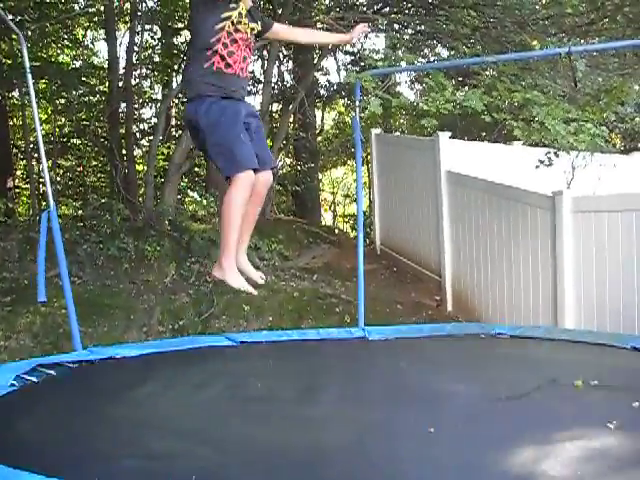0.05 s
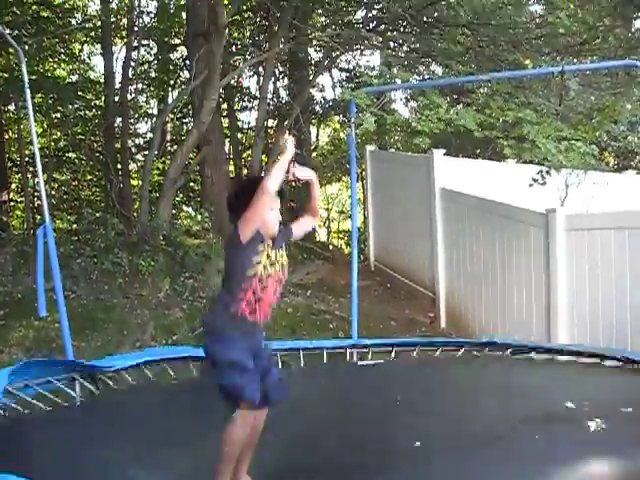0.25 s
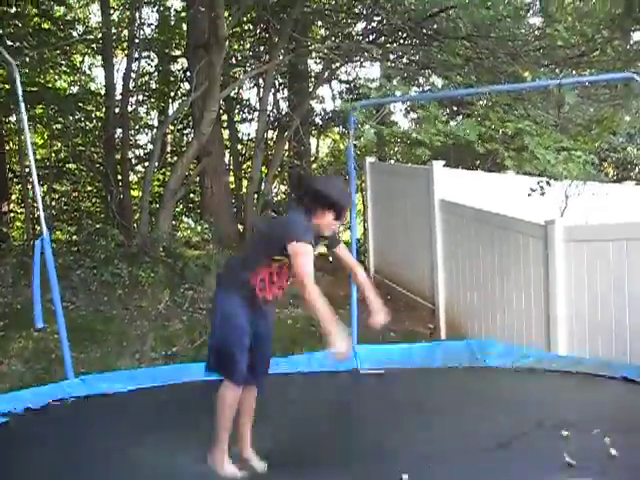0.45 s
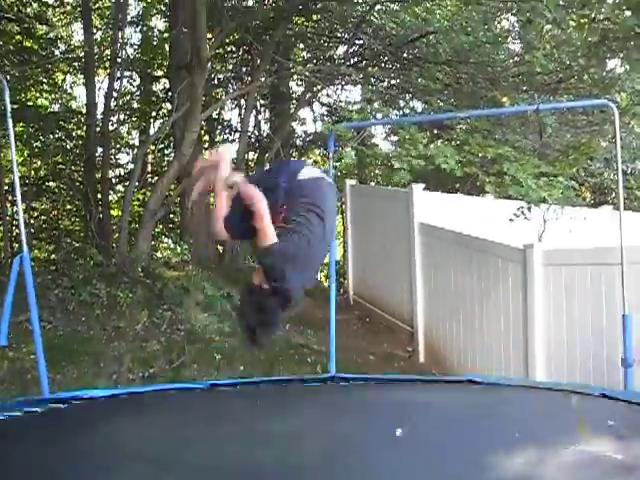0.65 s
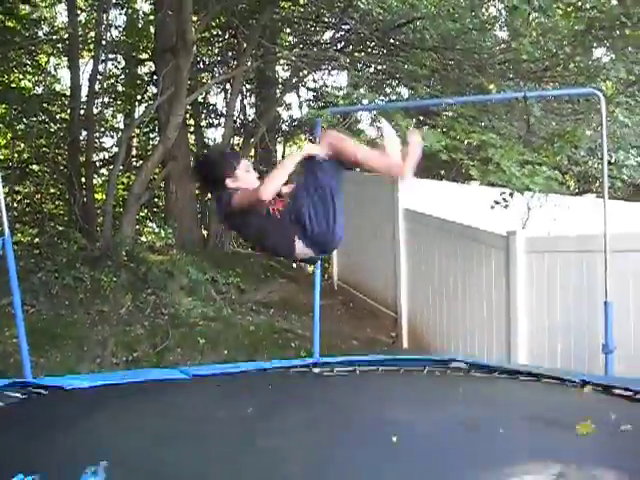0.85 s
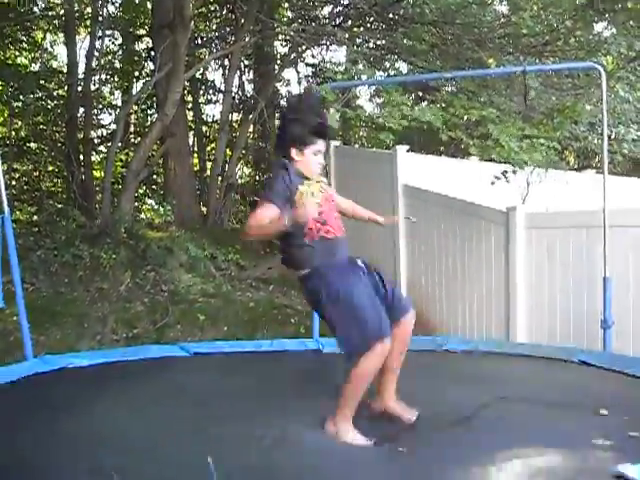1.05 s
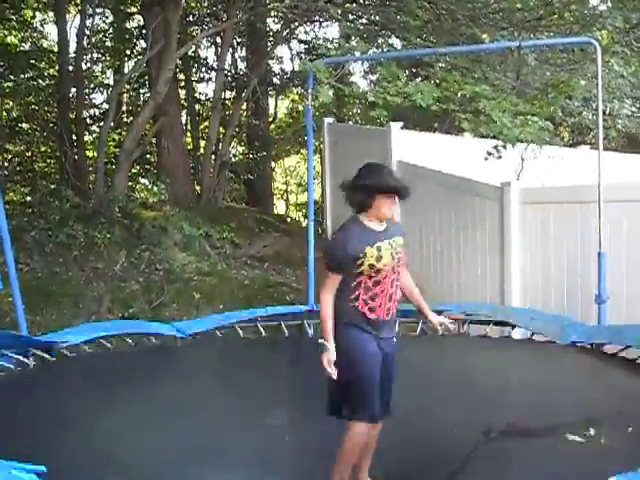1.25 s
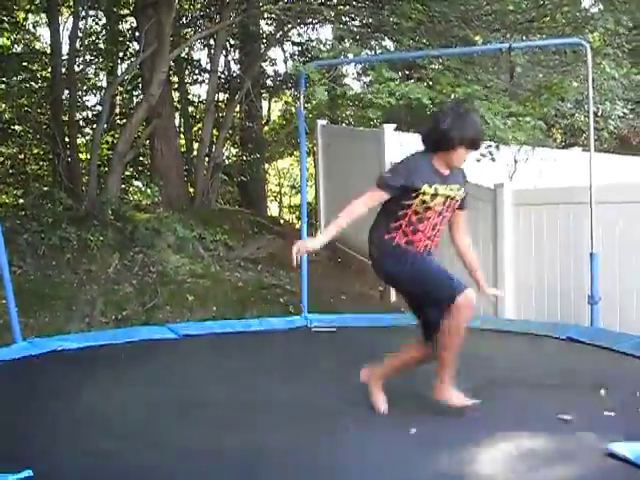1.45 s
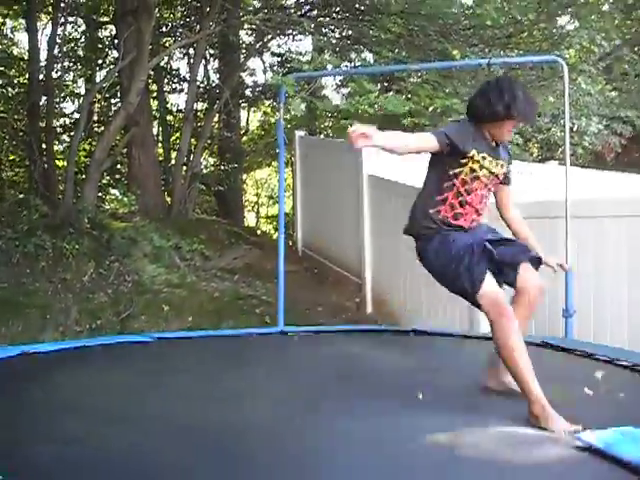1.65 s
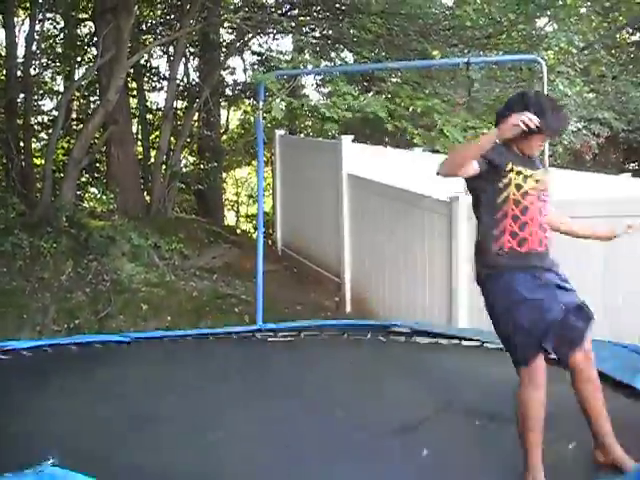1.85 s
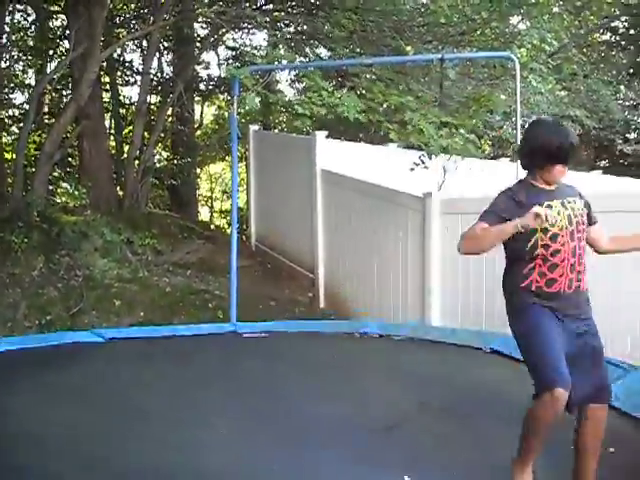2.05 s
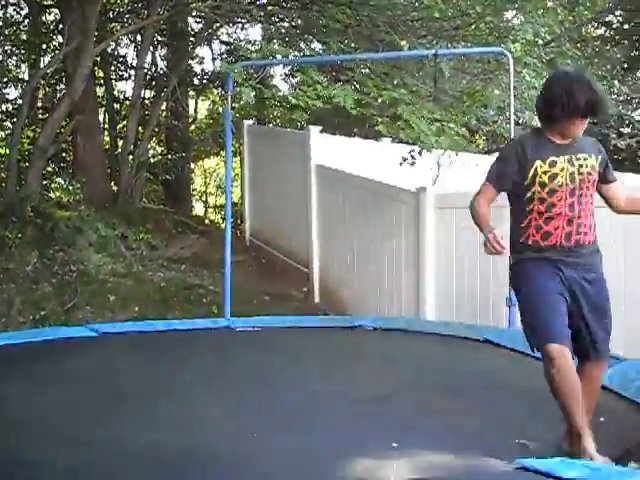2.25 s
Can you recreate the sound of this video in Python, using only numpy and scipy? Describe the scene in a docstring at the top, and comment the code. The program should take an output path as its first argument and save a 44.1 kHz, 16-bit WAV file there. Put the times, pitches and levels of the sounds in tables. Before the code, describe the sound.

Trampoline springs rasp and ring through three bounces, with low thuds on landing.

```python
"""Trampoline springs rasp as a child bounces three times, close by in a backyard.
The mat stretches and recoils; the hooks stick and slip, ringing the steel springs and frame.
Deep stretches add a bright scrape and one hook clanks.
The first two landings give low thuds; all three shudder.
Faint outdoor air and a deep hum lie underneath. The sound cuts off during the third landing."""
import sys
import numpy as np
from scipy import signal
from scipy.fft import rfft, irfft
from scipy.io import wavfile

SR = 44100
rng = np.random.default_rng(int(sys.argv[2]) if len(sys.argv) > 2 else 0)


def log_audio(samples):
    """Write samples as a 16-bit WAV file to the path given in sys.argv[1]."""
    # one column per channel
    frames = np.atleast_2d(samples).T
    # limit to full scale, then quantise
    limited = np.clip(frames, -1, 1)
    pcm = np.round(limited * 32767).astype(np.int16)
    wavfile.write(sys.argv[1], SR, pcm)


N = 101429
TIME = np.arange(N) / SR
FREQ_HZ = np.fft.rfftfreq(N, 1 / SR)


def amp(db):
    """Decibels to gain."""
    return 10 ** (np.asarray(db) / 20)


def unit(x):
    """Scale to unit rms."""
    return x / np.sqrt(np.mean(x ** 2) + 1e-20)


def curve(points):
    """Gain over time from (s, dB) points."""
    return amp(np.interp(TIME, *np.transpose(points)))


def shaped(x, points):
    """Filter by (Hz, dB) points."""
    hz, db = np.transpose(points)
    gain = amp(np.interp(np.log(FREQ_HZ + 1), np.log(hz), db))
    return irfft(rfft(x) * gain, N)


def colour(x, points):
    """Filter by (Hz, dB) points, then scale to unit rms."""
    return unit(shaped(x, points))


def wander(scale_s):
    """Smooth random motion, unit rms."""
    lowpass = np.exp(-(FREQ_HZ * scale_s) ** 2)
    return unit(irfft(rfft(rng.standard_normal(N)) * lowpass, N))


def decay(start_s, t60_s):
    """Step onset, exponential decay."""
    return (TIME >= start_s) * amp(-60 * np.maximum(TIME - start_s, 0) / t60_s)


def ring(x, response):
    """Pass x through a ringing body of unit energy."""
    return signal.fftconvolve(x, response / np.linalg.norm(response))[:N]


# Each row: frequency in Hz, relative density in dB.
AIR_SPECTRUM = [(15, -7), (45, -2.5), (80, -0.5), (120, -5.5), (180, -6), (300, -13), (600, -18.5),
                (1200, -25), (3000, -29.5), (9500, -34)]
# Each row: time in seconds, hum level in dB.
HUM_LEVELS = [(0, -51), (.2, -43), (.3, -49), (.62, -60), (.8, -47), (1.2, -40.5), (1.65, -49),
              (1.88, -42.5), (2.03, -42)]


def yard(air_db=-47, hum_hz=31, waver=.07, overtone_ratio=2.55, overtone_db=-6.5):
    """Faint outdoor air and a deep wavering hum with one overtone."""
    pitch_hz = hum_hz * (1 + waver * wander(.15))
    phase = 2 * np.pi * np.cumsum(pitch_hz) / SR
    hum = unit(np.sin(phase) + amp(overtone_db) * np.sin(overtone_ratio * phase))
    air = colour(rng.standard_normal(N), AIR_SPECTRUM)
    return amp(air_db) * air + curve(HUM_LEVELS) * hum


def slips(rate_per_s=5000, spread_db=.5, chatter_db=2.28, chatter_s=.008):
    """Dense stick-slip clicks of uneven size, bunched by chatter."""
    size = amp(spread_db * np.minimum(rng.exponential(1, N), 4))
    sign = rng.choice([-1, 1], N)
    slipping = rng.random(N) < rate_per_s / SR
    chatter = amp(chatter_db * wander(chatter_s))
    return unit(size * sign * slipping * chatter)


def coils(clicks, coil_t60_s=.06, coil_db=.5, frame_t60_s=.3, frame_db=-7):
    """The coils smear each click in time; the frame adds a dense, fine ring."""
    coil_tail = rng.standard_normal(N) * decay(0, coil_t60_s)
    smear = 1 + amp(coil_db) * rfft(coil_tail / np.linalg.norm(coil_tail))
    allpass = smear / abs(smear)
    frame_tail = rng.standard_normal(N) * decay(0, frame_t60_s)
    frame = 1 + amp(frame_db) * rfft(frame_tail / np.linalg.norm(frame_tail))
    return irfft(rfft(clicks) * allpass * frame, N)


def steel(modes, start_s=0, detune=0):
    """Steel modes after one tap; detune is the fractional pitch spread between springs."""
    tone = np.zeros(N)
    for hz, db, t60_s in modes:
        pitch_hz = hz * (1 + detune * rng.uniform(-1, 1))
        tone += amp(db) * decay(start_s, t60_s) * np.sin(2 * np.pi * (pitch_hz * TIME + rng.random()))
    return tone


# Slip strength per bounce. Each row: time in seconds, drive level in dB.
BOUNCE_1 = [(.16, -87), (.174, -51), (.205, -48), (.24, -37.5), (.30, -32), (.35, -30.5), (.39, -32),
            (.465, -31), (.5, -33.5), (.565, -33.5), (.6, -38.5), (.66, -39.5), (.69, -43.5), (.71, -40),
            (.73, -38), (.755, -33.5), (.79, -38.5), (.82, -48)]
BOUNCE_2 = [(.9, -50), (1.045, -48.5), (1.075, -56.5), (1.1, -47), (1.14, -42), (1.178, -33.5), (1.2, -36),
            (1.228, -31.5), (1.255, -34), (1.275, -40.5), (1.34, -39), (1.41, -35.5), (1.45, -35),
            (1.515, -32), (1.56, -39), (1.61, -41), (1.654, -47)]
BOUNCE_3 = [(1.659, -31.5), (1.678, -36), (1.7, -42), (1.725, -42), (1.77, -49), (1.784, -33.5),
            (1.8, -35.5), (1.84, -33), (1.91, -30), (1.97, -30), (2.04, -31)]
# Each row: frequency in Hz, relative density in dB.
RASP_SPECTRUM = [(100, -21.5), (300, -6.5), (600, -12.5), (850, -9.5), (1050, 0), (1280, -1), (1750, -2.5),
                 (2400, 2), (3300, -0.5), (4000, -3.5), (5800, -6), (6600, -2.5), (8000, -2.5), (9900, -4)]
# Each row: frequency in Hz, gain in dB.
TREBLE_BAND = [(3300, -44.5), (4200, -2.5), (6000, 0.5)]
# Each row: time in seconds, treble boost in dB.
TREBLE_BOOST = [(.2, 3.5), (.33, 1.5), (.43, -2.5), (.56, 1.5), (.7, 0), (.76, 0), (.95, -0.5), (1.04, 4.5),
                (1.17, -1.5), (1.3, 1.5), (1.38, -1), (1.55, 1), (1.67, 0.5), (1.75, 5), (2.0, 0.5)]
# Short ring of springs and frame; long ring of springs through the flight.
# Each row: frequency in Hz, relative level in dB, T60 in seconds.
STEEL_MODES = [(357, -9, .2), (702, -7, .4), (1233, -4, .13), (1278, -6, .16), (2375, 2, .2),
               (2480, -2, .12), (2650, -5, .15), (2960, -5, .2), (3325, -6, .25), (6381, -1, .2),
               (6457, -2, .2), (6604, -2, .2), (6720, -3, .2), (7218, -5, .2)]
SINGING_MODES = [(674, -37.5, 1.2), (2385, 0, 1.9), (2520, 2.5, 2.8), (2610, 4, 1.4), (2640, -0.5, 2.5),
                 (6730, 0, 1.3), (6660, 1, 2), (6830, -3.5, 1.3)]


def springs(rasp_db=2.5, steel_db=-12, singing_db=-24):
    """Hooks slip as the mat moves; the slips rasp and keep the steel ringing."""
    clicks = slips()
    effort = curve(BOUNCE_1 + BOUNCE_2 + BOUNCE_3)
    rasp = colour(coils(clicks), RASP_SPECTRUM)
    rasp += (curve(TREBLE_BOOST) - 1) * shaped(rasp, TREBLE_BAND)
    ringing = ring(clicks * effort, steel(STEEL_MODES))
    singing = ring(clicks * effort, steel(SINGING_MODES))
    return amp(rasp_db) * effort * rasp + amp(steel_db) * ringing + amp(singing_db) * singing


# Each row: start in seconds, level in dB, pitch in Hz.
THUDS = [(0.165, -33.5, 112), (0.318, -29, 84.8), (0.344, -29.5, 105), (0.458, -22.5, 180),
         (1.087, -30, 196), (1.370, -23, 154)]


def thuds(t60_s=.04):
    """Feet and mat thud in the first two landings: low, heavily damped tones."""
    return -sum(amp(db) * decay(start_s, t60_s) * np.sin(2 * np.pi * hz * (TIME - start_s))
                for start_s, db, hz in THUDS)


# Each row: start in seconds, gain in dB.
JOLTS = [(0.168, -57), (1.09, -63)]


def jolts():
    """The first two touchdowns jolt the slack springs into singing."""
    return sum(amp(db) * steel(SINGING_MODES, start_s) for start_s, db in JOLTS)


# Each row: peak time, rise constant and T60 in seconds, level in dB.
SHUDDERS = [(.205, .02, 0.9, -46), (0.326, 0.014, 0.39, -34.5), (0.424, .02, 0.28, -34.5),
            (.462, 0.0077, 0.065, -27), (0.528, 0.014, 0.83, -43), (0.994, 0.016, 0.12, -45.5),
            (1.091, 0.0035, 0.17, -47), (1.24, 0.11, 0.39, -49.5), (1.381, 0.027, 0.22, -29),
            (1.484, .015, 0.35, -45), (1.981, 0.065, 0.71, -40)]
# Each row: frequency in Hz, relative density in dB.
SHUDDER_SPECTRUM = [(30, -13), (80, -5.5), (160, -2.5), (330, -0.5), (600, -7.5), (1200, -7.5),
                    (1800, -17.5), (4000, -36), (10000, -48.5)]


def shudders():
    """Mat and frame rumble under load."""
    level = np.zeros(N)
    for peak_s, rise_s, t60_s, db in SHUDDERS:
        swell = np.exp(-abs(TIME - peak_s) / rise_s)
        level += amp(db) * np.where(TIME < peak_s, swell, decay(peak_s, t60_s))
    return level * colour(slips(), SHUDDER_SPECTRUM)


# Each row: start, attack, hold and release in seconds, level in dB.
SCRAPES = [(0.263, 0.018, 0.052, 0.046, -30), (1.197, 0.014, 0.1, .03, -43),
           (1.406, 0.053, .03, 0.035, -34.5), (1.643, 0.0022, .012, 0.014, -43),
           (1.698, .005, .025, 0.036, -42.5), (1.781, .002, .007, 0.014, -33), (1.79, 0.13, 0.14, .05, -28)]
# Each row: frequency in Hz, relative density in dB.
SCRAPE_SPECTRUM = [(1000, -35), (4000, -11), (5900, -11.5), (6500, -12), (8300, -9.5), (9150, 4),
                   (9600, -6), (10200, -8.5)]


def scrapes():
    """Deeply stretched springs slip with a brighter, squeakier scrape."""
    level = np.zeros(N)
    for start_s, attack_s, hold_s, release_s, db in SCRAPES:
        corners_s = start_s + np.cumsum([0, attack_s, hold_s, release_s])
        level += amp(db) * np.interp(TIME, corners_s, [0, 1, 1, 0])
    return level * colour(coils(slips()), SCRAPE_SPECTRUM)


# Each row: frequency in Hz, gain in dB.
CLANK_FILTER = [(300, -35), (1200, -5), (2400, -7.5), (4000, -16), (6000, -5), (6600, -4), (8000, -1.5),
                (10000, -2)]


def clank(start_s=.3485, gain_db=-18.5, ring_db=-5, spring_count=5):
    """A hook snaps into place: a tick, a splash of coil noise, neighbouring springs ringing."""
    tick = amp(.5) * decay(start_s, t60_s=.0055)
    splash = decay(start_s, t60_s=.17)
    burst = (tick + splash) * colour(rng.standard_normal(N), CLANK_FILTER)
    jangle = sum(steel(STEEL_MODES, start_s, detune=.02) for _ in range(spring_count))
    ringing = shaped(jangle / np.sqrt(spring_count), CLANK_FILTER)
    return amp(gain_db) * (burst + amp(ring_db) * ringing)


def scene():
    """Trampoline and yard, mono."""
    return (springs() + jolts() + scrapes() + clank() + thuds() + shudders() + yard())[None]


# Each row: frequency in Hz, gain in dB.
TREBLE_ROLLOFF = [(20, -0.5), (9900, 1), (10400, -3), (10900, -20), (11700, -18.5), (12250, -28),
                  (12700, -45.5)]


def record(dry, end_s=2.038, cutoff_hz=12800):
    """Treble roll-off, abrupt stop, steep low-pass."""
    heard = shaped(dry[0], TREBLE_ROLLOFF) * (TIME < end_s)
    lowpass = signal.firwin(511, cutoff_hz, window=("kaiser", 9), fs=SR)
    return signal.oaconvolve(heard, lowpass, "same")[None]


dry = scene()
out = record(dry)
log_audio(out)
```